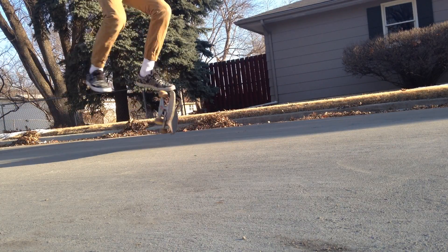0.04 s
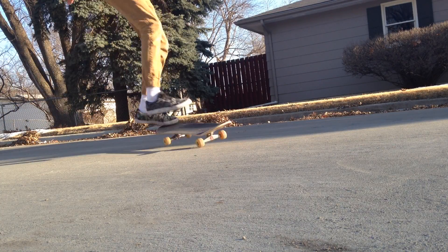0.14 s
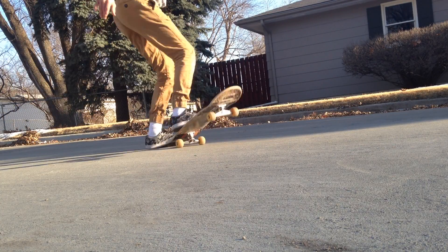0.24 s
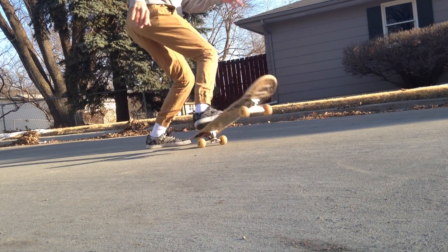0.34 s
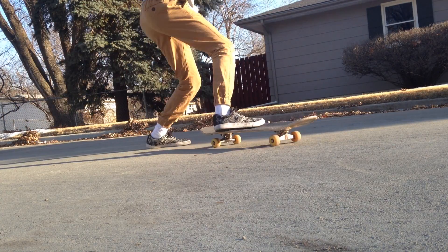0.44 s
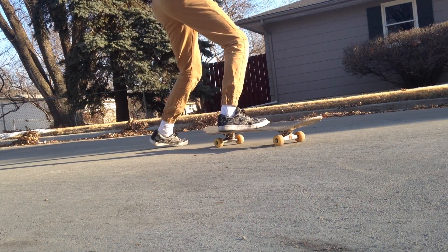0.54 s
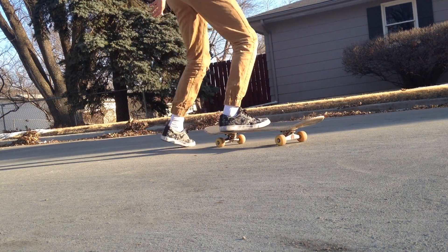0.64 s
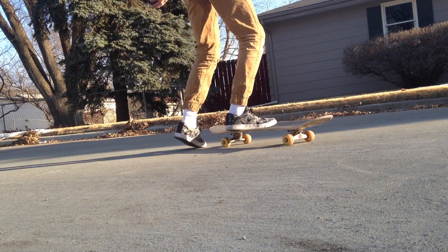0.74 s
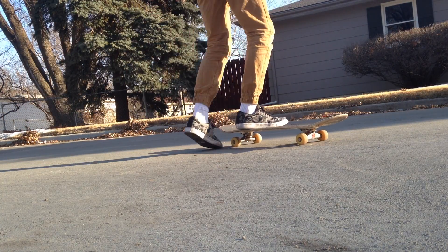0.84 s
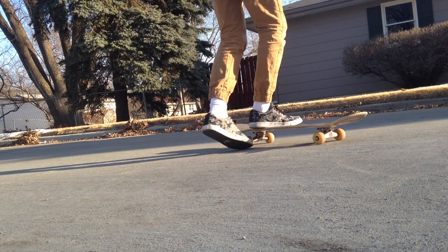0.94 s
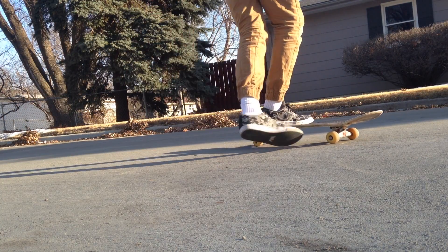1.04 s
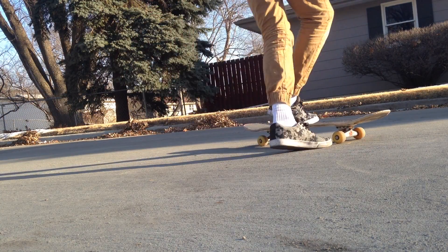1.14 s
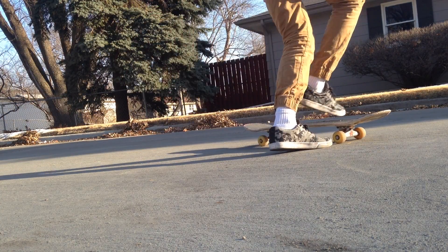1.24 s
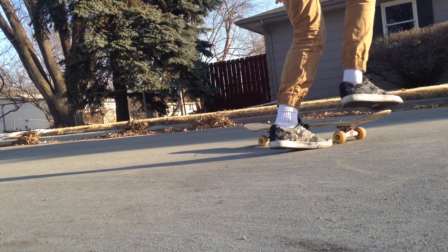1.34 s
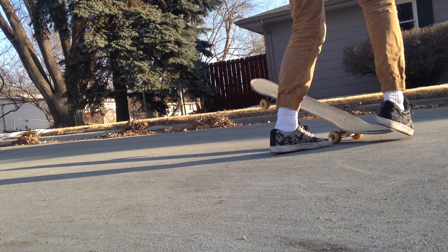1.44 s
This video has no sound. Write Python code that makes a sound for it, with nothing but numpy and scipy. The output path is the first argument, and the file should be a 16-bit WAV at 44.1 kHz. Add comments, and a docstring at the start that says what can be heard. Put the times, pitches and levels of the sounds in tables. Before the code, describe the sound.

A skateboard scrapes, slams onto asphalt on its rear wheels and slaps its front wheels down. The rider's shoe then drags over grit, taps twice and lands flat on the road, close by over a faint outdoor rumble.

```python
"""Over a low outdoor rumble a skateboard scrapes on asphalt. At 0.2 s it slams down on its rear wheels
and the steel trucks clack; at 0.45 s the nose wheels slap down and bounce. Each impact excites the modes
of deck and wheels, and the hardest ones clip. From 0.55 s the rider's shoe rubs, then drags over grit
with a brightening friction hiss; it steps, taps twice and slaps onto the road at 1.4 s.
Houses answer faintly throughout."""
import sys
import numpy as np
from scipy import signal
from scipy.fft import rfft, irfft, next_fast_len
from scipy.io import wavfile

SR = 44100
rng = np.random.default_rng(int(sys.argv[2]) if len(sys.argv) > 2 else 0)


def unload_wav(signal):
    """Save mono or channel-first audio to the path in sys.argv[1] as 16-bit WAV at rate SR, clipped to [-1, 1]."""
    wavfile.write(
        sys.argv[1],
        SR,
        np.round(np.clip(np.atleast_2d(signal).T, -1, 1) * 32767).astype(np.int16),
    )


N = 66150


def amp(db):
    """Amplitude ratio of a level in decibels."""
    return 10 ** (np.asarray(db) / 20)


def unit(x):
    """Normalisation to an rms of 1."""
    return x / np.sqrt(np.mean(x ** 2) + 1e-20)


def clock():
    """Time of each sample in seconds."""
    return np.arange(N) / SR


def along(points, hz):
    """Interpolation of (frequency [Hz], value) points on a logarithmic frequency axis."""
    knots_hz, values = np.transpose(points)
    return np.interp(np.log(hz + 1), np.log(knots_hz + 1), values)


def level(rows):
    """Amplitude envelope through (time [s], level [dB]) points."""
    return amp(np.interp(clock(), *np.transpose(rows)))


def filtered(x, response):
    """Linear filtering: the spectrum of x is multiplied by a frequency response."""
    size = next_fast_len(N + SR // 2)
    return irfft(rfft(x, size) * response(np.fft.rfftfreq(size, 1 / SR)), size)[:N]


def wander(rate):
    """Random modulation: straight lines between Gaussian values, `rate` of them a second."""
    return np.interp(clock() * rate, np.arange(N), rng.standard_normal(N))


def noise(spectrum, tilt_db=0, grain_db=0, grain_rate=500):
    """Coloured noise of rms 1; random amplitude modulation breaks it into grains."""
    def response(hz):
        octaves = np.log2(np.maximum(hz, 300) / 1000)
        return amp(along(spectrum, hz) + tilt_db * octaves)
    grains = amp(grain_db * wander(grain_rate))
    return unit(filtered(grains * rng.standard_normal(N), response))


def burst(t60, attack):
    """Envelope of a damped vibration: quick rise, exponential decay."""
    return amp(-60 * clock() / t60) * (1 - np.exp(-clock() / attack))


def ring(modes, attack):
    """Modal superposition: damped sines of alternating sign, their levels varying a little per blow."""
    return sum((-1) ** k * amp(db + rng.normal(0, 0.22)) * burst(t60, attack)
               * np.sin(2 * np.pi * hz * clock()) for k, (hz, db, t60) in enumerate(modes))


def clatter(spectrum, t60, tilt_db, rise, damping):
    """Dense modes overlap into noise; t60 holds at 1 kHz and each higher octave dies sooner."""
    dense = noise(spectrum, tilt_db)
    centres_hz = 125 * 2 ** np.arange(8)
    out = np.zeros(N)
    for centre, weights in zip(centres_hz, np.eye(len(centres_hz))):
        band = filtered(dense, lambda hz: along(np.c_[centres_hz, weights], hz))
        out += band * burst(t60 * (1000 / centre) ** damping, rise)
    return out


def add(track, start_s, x):
    """Superposition of x on the track from a given time."""
    i = max(round(start_s * SR), 0)
    track[i:] += x[:N - i]


def outdoors():
    """Ambient noise: a steady broadband floor under a slowly varying rumble."""
    # spectra of the floor and the rumble: (frequency [Hz], level [dB])
    floor_spectrum = [(100, -17), (300, -16), (600, -9.5), (1200, -17.5), (2600, -30.5), (4000, -28),
                      (9000, -34), (15000, -36.5)]
    rumble_spectrum = [(25, -24.5), (70, -8.5), (130, -1.5), (240, -11), (500, -25), (2000, -57.5)]
    # envelope of the rumble: (time [s], level [dB])
    rumble_envelope = [(0, -42), (.17, -43), (.4, -48), (.6, -55.5), (.95, -49), (1.3, -47), (1.5, -48)]
    return amp(-53) * noise(floor_spectrum) + level(rumble_envelope) * noise(rumble_spectrum)


def street(x):
    """Diffuse reflection from houses and trees: convolution with a decaying noise tail."""
    # reverberation time: (frequency [Hz], t60 [s])
    decay = [(200, 0.52), (1500, 0.29), (10000, 0.264)]
    hz, t, spectra = signal.stft(rng.standard_normal(SR // 2), SR, nperseg=256)
    fade = amp(-60 * t / along(decay, hz)[:, None])
    tail = signal.istft(spectra * fade, SR, nperseg=256)[1]
    return signal.fftconvolve(x, tail / np.linalg.norm(tail))[:N]


def grit():
    """Granular contact noise: loose grains crunch under shoes and wheels, and a few snap singly."""
    # crunches: (start [s], duration [s], level [dB], tilt [dB/octave])
    scuffs = [(0, 0.041, -47.5, 0), (0.239, 0.07, -36.5, 0.5), (0.307, 0.038, -27.5, -4.5),
              (0.338, .035, -56, 9), (0.515, 0.038, -33.5, -7.5), (0.581, 0.029, -46, 3),
              (0.607, 0.053, -45, 10), (0.989, 0.024, -38, 8), (1.013, 0.03, -54.5, 8),
              (1.082, 0.098, -51.5, -0.5), (1.426, 0.008, -33, -6.5), (1.44, 0.0097, -40.5, -1.5),
              (1.49, 0.012, -46, 1.5)]
    # single grains: (time [s], level [dB])
    snaps = [(0.472, -21), (.56, -26.5), (.565, -23), (1.007, -30.5), (1.0105, -44), (1.4965, -20)]
    # spectrum of the grains: (frequency [Hz], level [dB])
    spectrum = [(300, -19.5), (1000, 1.5), (2700, -3), (4800, 1), (9000, -7), (13000, -16.5), (15500, -21)]
    out = np.zeros(N)
    for start, length, db, tilt_db in scuffs:
        stroke = np.clip(np.minimum(clock(), length - clock()) / (length * 0.1), 0, 1)
        add(out, start, amp(db) * stroke * noise(spectrum, tilt_db, grain_db=4.5, grain_rate=730))
    for start, db in snaps:
        add(out, start, amp(db) * noise(spectrum) * burst(t60=0.0018, attack=0.0001))
    return out


def shoe_drag():
    """Sliding friction: the rubber sole rubs, then drags with a dull rasp that brightens to a hiss."""
    # envelopes of the shifting foot and of the slide: (time [s], level [dB])
    rub_envelope = [(.55, -75), (.57, -39), (.6, -54), (.625, -54), (.64, -45.5), (.658, -37), (.668, -52),
                    (.7, -66)]
    drag_envelope = [(.66, -60), (.69, -50), (.74, -46.5), (.8, -41), (.86, -41), (.9, -42.5), (.93, -50),
                     (.985, -50), (1.03, -90)]
    # friction spectra: (frequency [Hz], level [dB])
    rub_spectrum = [(200, -20.5), (550, -9.5), (850, 2.5), (1150, 0), (1450, -13.5), (1850, -4),
                    (3000, -25), (12000, -31)]
    rasp_spectrum = [(200, -15.5), (650, 4), (1100, 3), (1500, 1.5), (2600, -3), (3300, 4), (4500, -4),
                     (7000, -6.5), (15000, -14.5)]
    hiss_spectrum = [(200, -6), (600, 1.5), (1100, 3.5), (1500, -7), (2600, -4), (3600, -3.5), (5200, 2),
                     (6600, -3), (9000, 0), (13000, -7.5), (15500, -13)]
    rasp = noise(rasp_spectrum)
    hiss = noise(hiss_spectrum, grain_db=3, grain_rate=810)
    rub = noise(rub_spectrum, grain_db=2, grain_rate=160)
    bright = np.interp(clock(), (0.82, 0.86), (0, 1))
    slide = np.sqrt(1 - bright) * rasp + np.sqrt(bright) * hiss  # equal-power crossfade
    return level(drag_envelope) * slide + level(rub_envelope) * rub


def footfalls():
    """Damped impacts: a flat rubber sole slaps with a hollow thud; light taps give only a dead knock."""
    # steps: (time [s], level [dB], t60 [s], tilt [dB/octave], relative thud level [dB])
    steps = [(.9935, -37.5, 0.042, -7, 2.5), (1.4184, -15.5, 0.054, 0.5, 2.5)]
    # spectrum of the slap: (frequency [Hz], level [dB])
    slap_spectrum = [(40, -31), (130, -4), (260, -1), (500, -9), (900, -5), (1600, -4), (2600, -11.5),
                     (3200, -9), (4400, -6.5), (7500, -17), (15000, -46)]
    # modes of the thud: (frequency [Hz], level [dB], t60 [s])
    thud_modes = [(160, -3.5, 0.058), (395, -2.5, 0.025), (511, -1, 0.06), (792, 0, 0.029),
                  (1075, -16, 0.067), (1246, -12, 0.067), (1514, -14, 0.077), (3356, 2, 0.012),
                  (4200, -2.5, 0.014)]
    # light taps: (time [s], level [dB], fundamental [Hz], t60 of the fundamental [s])
    taps = [(1.1595, -13.5, 392, 0.015), (1.1789, -15.5, 634, 0.0055)]
    # modes of a tap: (frequency ratio [1], level [dB])
    tap_modes = [(1, 0), (2.35, 0.5), (4.1, -17)]
    attack_s = 0.0013
    out = np.zeros(N)
    for start, db, t60, tilt_db, thud_db in steps:
        thud = amp(thud_db) * ring(thud_modes, attack_s)
        slap = clatter(slap_spectrum, t60, tilt_db, attack_s, damping=0.4)
        add(out, start, amp(db) * (slap + thud))
    for start, db, hz, t60 in taps:
        modes = [(hz * ratio, mode_db, t60 / ratio) for ratio, mode_db in tap_modes]
        add(out, start, amp(db) * ring(modes, attack_s))
    return out


def board_scrape():
    """Sliding friction: the board judders over the asphalt, giving grainy noise."""
    # envelope of the scrape: (time [s], level [dB])
    envelope = [(0, -20.5), (.012, -30.5), (.02, -41), (.044, -34.5), (.046, -20), (.057, -23),
                (.064, -26.5), (.088, -28.5), (.102, -36.5), (.12, -49.5), (.142, -39), (.17, -69.5),
                (.2, -40), (.22, -81)]
    # spectrum of the scrape: (frequency [Hz], level [dB])
    spectrum = [(100, -29), (330, -1), (550, -9), (950, 1.5), (1250, -2), (1480, 1), (1750, 0),
                (2200, -14.5), (3200, -27.5), (8000, -39.5), (15000, -45)]
    return level(envelope) * noise(spectrum, grain_db=2.5, grain_rate=490)


def rolling_wheels():
    """Rolling noise: the loaded wheels rumble around a drone with random frequency modulation."""
    # envelope of the roll: (time [s], level [dB])
    envelope = [(.17, -52.5), (.2, -25), (.25, -30), (.3, -46), (.335, -36.5), (.355, -23), (.382, -25.5),
                (.41, -33.5), (.435, -34.5), (.452, -23), (.5, -52), (.54, -34.5), (.6, -61), (.7, -65),
                (.9, -61.5), (.97, -45.5), (1.06, -58)]
    # spectrum of wheels on asphalt: (frequency [Hz], level [dB])
    spectrum = [(50, -35.5), (180, -4.5), (290, -2.5), (400, -2.5), (650, -9), (1100, -11.5), (2200, -26.5),
                (5000, -33.5), (15000, -49)]
    drone_hz = 321 + 70.2 * wander(rate=170)
    drone = unit(np.sin(2 * np.pi * np.cumsum(drone_hz) / SR))
    rumble = noise(spectrum, grain_db=2, grain_rate=290)
    return level(envelope) * unit(rumble + amp(-0.5) * drone)


def trucks():
    """Contact chatter: steel parts build up to a short clack that is strongest near 3.4 kHz."""
    # clacks: (time [s], level [dB], rise [s], t60 [s])
    clacks = [(0.2196, 2.5, 0.00039, 0.0038), (0.2669, -17, .002, 0.015), (0.321, -12.5, 0.0048, 0.0133),
              (0.3275, -9.5, 0.00022, 0.011), (0.4528, -14, 0.001, 0.027)]
    # spectrum of the rattling steel: (frequency [Hz], level [dB])
    spectrum = [(300, -22.5), (1300, -2), (2350, -1.5), (2750, -8), (3150, 4.5), (3500, 7), (3900, -11),
                (4200, 2), (4800, -21.5), (6000, -17), (8000, -14), (15000, -36)]
    out = np.zeros(N)
    for start, db, rise, t60 in clacks:
        build_up = np.minimum(clock() / rise, 1)
        decay = amp(-60 * np.maximum(clock() - rise, 0) / t60)
        add(out, start, amp(db) * build_up * decay * noise(spectrum))
    return out


def board_impacts():
    """Impulse excitation: each blow cracks, clatters and sets deck and wheels in free vibration."""
    # blows: (time [s], level [dB], rise [s], clatter t60 [s], clatter tilt [dB/octave],
    # relative deck level [dB], relative wheel level [dB])
    blows = [(0.2028, 2.5, 0.00068, 0.058, 0.05, -11.5, -20),
             (0.2345, -0.5, 0.00079, 0.063, -2.7, -12.5, -22), (0.2671, -16, 0.00057, 0.088, -5, -5, 0),
             (0.3272, -17.5, 0.0013, 0.072, -0.6, -11.5, 5),
             (0.4535, -0.5, 0.00019, 0.042, -0.02, -35.5, 2), (0.5189, -16, 0.0016, 0.072, -1.06, -11, 0)]
    # spectra of the crack and the clatter: (frequency [Hz], level [dB])
    crack_spectrum = [(300, 0.5), (1500, -17.5), (4000, 14.5), (9000, 14.5), (15000, -20)]
    clatter_spectrum = [(40, -27), (130, -19), (300, 1), (520, 2), (900, 5), (1700, -2.5), (2600, -11.5),
                        (3600, -5), (5500, -17), (8500, -14.5), (15000, -29)]
    # modes of the wooden deck, and of wheels and axle: (frequency [Hz], level [dB], t60 [s])
    deck_modes = [(175, -13.5, 0.09), (213.4, -9, 0.18), (279.6, -11, 0.16), (330, -7.5, 0.2),
                  (377, -13, 0.076), (446.6, -5.5, 0.15), (470.5, -10.5, 0.082), (506.5, -6, 0.158),
                  (636, -1.5, 0.051), (711, -3, 0.051), (894, -5, 0.067), (954, -7, 0.071),
                  (1210, -8, 0.076), (1451, -1.5, 0.062)]
    wheel_modes = [(146, -16, 0.045), (321.7, -14, 0.058), (639.6, -14, 0.022), (932, -4.5, 0.03),
                   (1038, -0.5, 0.039), (1170, -8, 0.052), (1377, -6, 0.044), (1696, -7, 0.043),
                   (1853, -12, 0.05)]
    out = np.zeros(N)
    for start, db, rise, t60, tilt_db, deck_db, wheel_db in blows:
        crack_db = -1 + 2 * tilt_db  # duller blows crack less
        crack = amp(crack_db) * noise(crack_spectrum) * burst(t60=0.008, attack=rise / 2)
        body = clatter(clatter_spectrum, t60, tilt_db, rise, damping=0.033)
        deck = amp(deck_db) * ring(deck_modes, rise)
        wheels = amp(wheel_db) * ring(wheel_modes, rise)
        add(out, start, amp(db) * (crack + body + deck + wheels))
    return out


def scene():
    """Superposition of the direct sound, its faint reflections and the ambient noise."""
    low_cut_hz, street_db = 67, -25.5
    near = (board_impacts() + trucks() + footfalls() + board_scrape() + rolling_wheels()
            + shoe_drag() + grit())
    # a low cut thins the deep bass of the board and shoe sounds
    near = filtered(near, lambda hz: (1j * hz / (low_cut_hz + 1j * hz)) ** 2)
    return (near + outdoors() + amp(street_db) * street(near))[None]


def record(dry):
    """Saturation and band limiting: the highest peaks clip softly, then the top treble is cut."""
    top_hz, edge_width_hz = 15500, 500
    clipped = dry[0] / (1 + np.abs(dry[0]) ** 8) ** (1 / 8)
    return filtered(clipped, lambda hz: np.clip((top_hz - hz) / edge_width_hz + 0.5, 0, 1))[None]


dry = scene()
out = record(dry)
unload_wav(out)
```